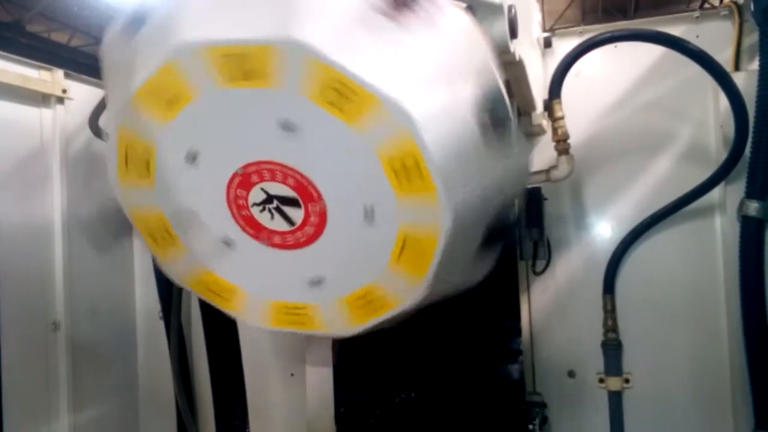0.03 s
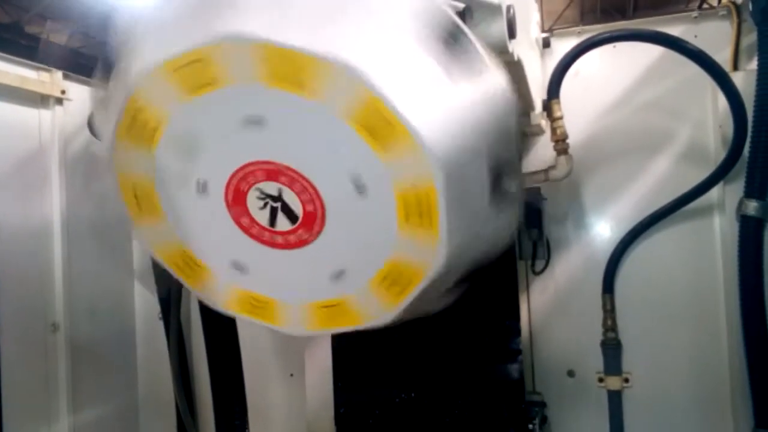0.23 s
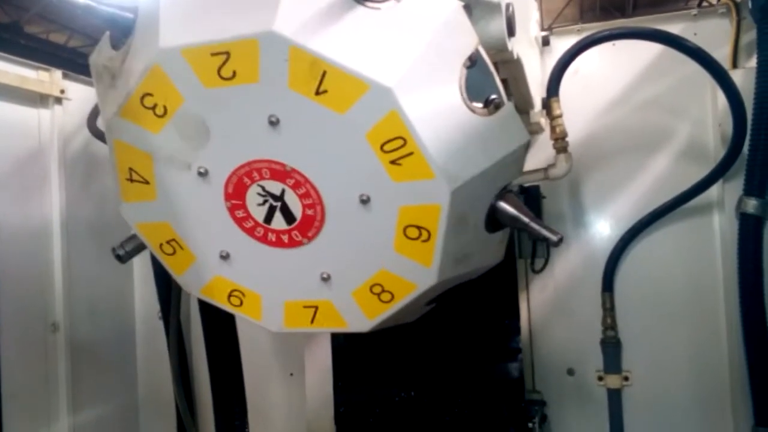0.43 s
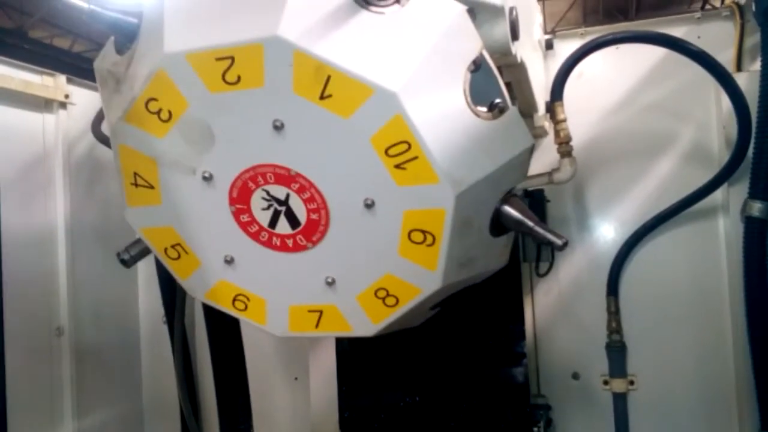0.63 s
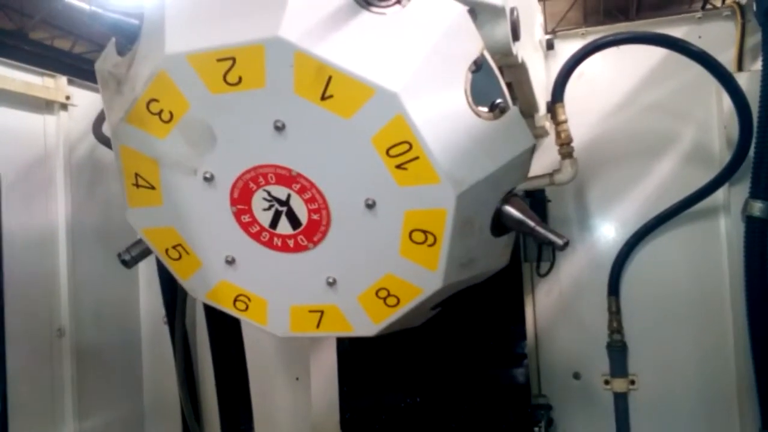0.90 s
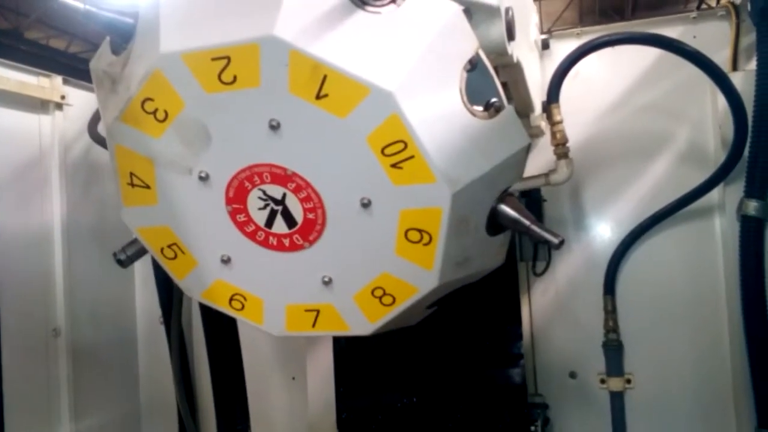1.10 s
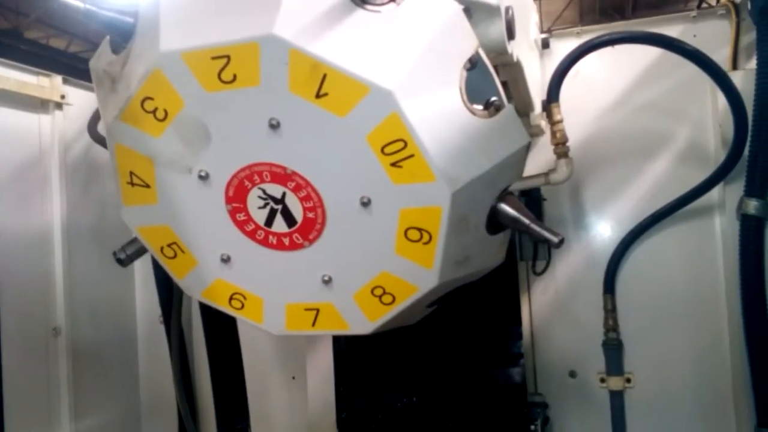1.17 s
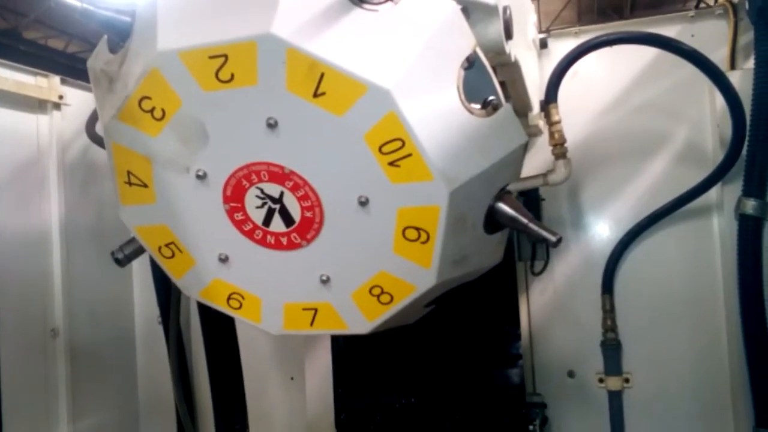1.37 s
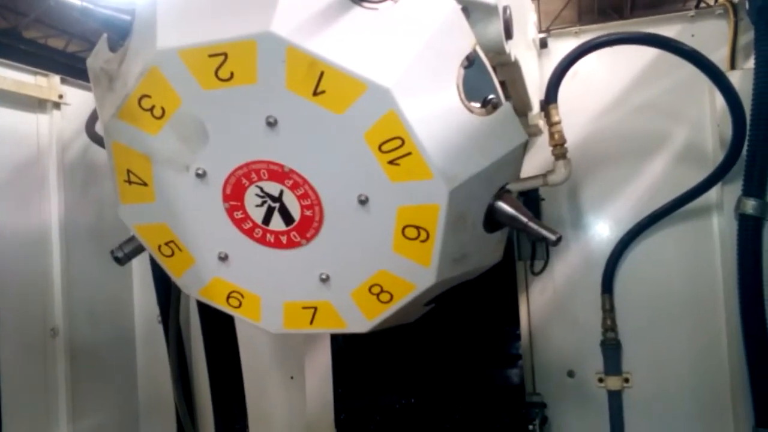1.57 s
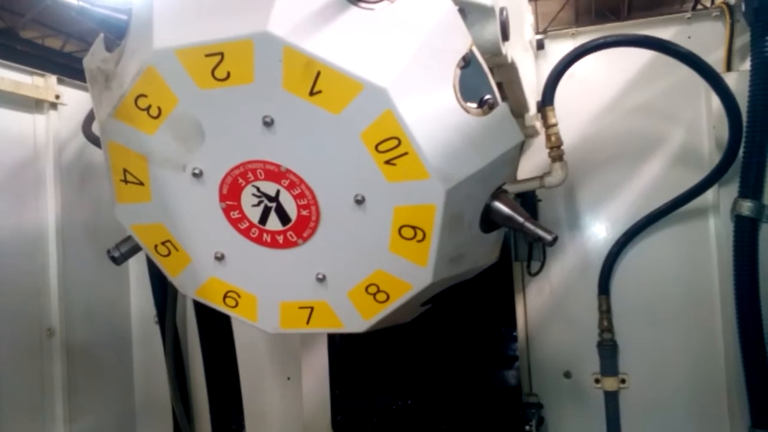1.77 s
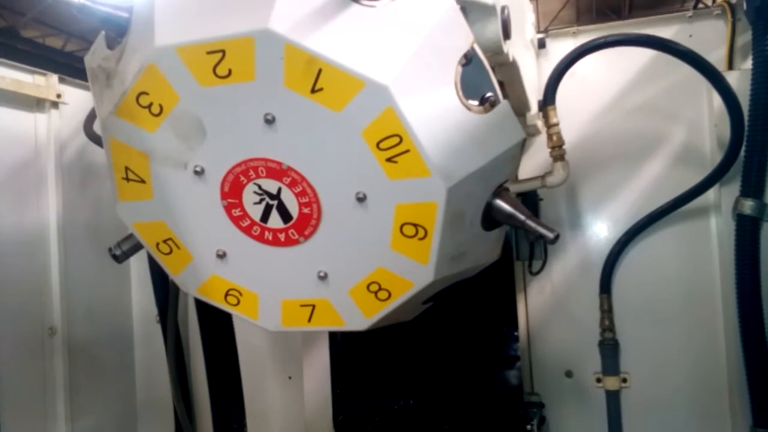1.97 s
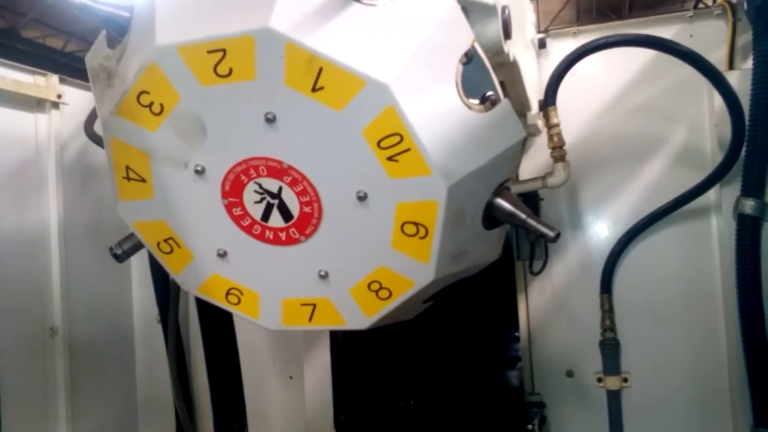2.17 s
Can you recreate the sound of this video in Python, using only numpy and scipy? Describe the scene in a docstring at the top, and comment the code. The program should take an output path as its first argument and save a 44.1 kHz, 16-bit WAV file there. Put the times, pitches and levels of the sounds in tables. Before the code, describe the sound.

Short, loud whirr and clunk of a turning tool turret, over machine hum and whistle.

```python
"""A rattling whirr of gears rises and falls: a tool turret swings two stations inside a steel machine tool.
The gears excite the resonances of the casing; steel clinks at top speed, the frame thuds at start and stop.
The servo drive's switching tone whistles throughout, over a humming pump, idle motors and cooling fans."""
import sys
import numpy as np
from scipy import signal
from scipy.fft import rfft, irfft
from scipy.io import wavfile
from scipy.ndimage import uniform_filter1d

SR = 44100
rng = np.random.default_rng(int(sys.argv[2]) if len(sys.argv) > 2 else 0)


def store_pcm(level_fs):
    """Save levels as 16-bit WAV."""
    pcm = np.round(np.clip(level_fs, -1, 1) * 32767).astype(np.int16)
    wavfile.write(sys.argv[1], SR, np.atleast_2d(pcm).T)


N = 99225
T = np.arange(N) / SR
HZ = np.fft.rfftfreq(N, 1 / SR)
START_S, TOP_S, STOP_S = .215, .408, .6
EDGE_HZ = 8500


def amp(db):
    """Decibels to gain."""
    return 10 ** (np.asarray(db) / 20)


def unit(x):
    """Scale to rms 1."""
    return x / np.sqrt(np.mean(x ** 2) + 1e-20)


def level(points):
    """Gain over time from (s, dB) points."""
    return amp(np.interp(T, *np.transpose(points)))


def over_hz(points, column=1):
    """Table column interpolated over log frequency."""
    rows = np.array(points, float)
    return np.interp(np.log(HZ + 1), np.log(rows[:, 0] + 1), rows[:, column])


def shape(x, gain):
    """Filter by a gain per frequency."""
    return irfft(rfft(x) * gain, N)


def noise():
    """Two channels of white noise."""
    return rng.standard_normal((2, N))


def drift(rate_hz):
    """Low-passed noise, rms 1."""
    return unit(shape(rng.standard_normal(N), np.exp(-(HZ / rate_hz) ** 2)))


def sides(left_db):
    """Stereo gains, left louder by left_db."""
    return amp([[left_db / 2], [-left_db / 2]])


def speed():
    """Turret motor speed: 0 to 1 and back."""
    return np.interp(T, [START_S, TOP_S, STOP_S], [0, 1, 0])


def gear_mesh(top_hz=1610, jitter=.0217, tilt_db_per_octave=1):
    """Meshing teeth whine in harmonics that follow the speed."""
    tooth_hz = top_hz * speed()
    phase = 2 * np.pi * np.cumsum(tooth_hz * (1 + jitter * drift(320))) / SR
    return sum(amp(tilt_db_per_octave * np.log2(k)) * np.sin(k * phase) * (k * tooth_hz < EDGE_HZ)
               for k in range(1, 13))


def gears(hits_per_s=9000, spread_db=1.5, mesh_db=-18):
    """Dense rattle and faint tooth whine excite the casing; three bands follow their own levels."""
    # Casing resonances. Each row: frequency in Hz, width in Hz, gain in dB.
    modes = [(250, 14, 7), (350, 22, 5), (465, 25, 3), (985, 40, 3), (1215, 25, 4), (1262, 10, 6),
             (1640, 30, 6), (1800, 30, 2), (2340, 35, 2), (2572, 25, 4), (2895, 55, 10), (3312, 35, 5),
             (3608, 28, 8), (3920, 40, 11), (4180, 90, 2), (4750, 90, 4), (5122, 20, 9), (6880, 80, 3)]
    # Broad gearbox colour. Each row: frequency in Hz, gain in dB.
    colour = [(150, -4.5), (450, -2.5), (780, -9), (1000, -6.5), (1800, 0.5), (2200, -4.5), (3000, -1),
              (4700, -5.5), (5100, -8.5), (5800, -8.5), (6900, -7.5), (7500, -22.5), (8500, -57.5)]
    # Each row: lower and upper band edge in Hz.
    bands = [(180, 750), (750, 2500), (2500, 9000)]
    # Each row: time in seconds, then low, middle and high band level in dB.
    band_levels = [(.215, -43.5, -57, -51.5), (.25, -28.5, -34, -34.5), (.28, -26.5, -32, -35.5),
                   (.29, -28, -29.5, -27), (.334, -17.5, -21, -18.5), (.378, -22, -20, -17.5),
                   (.388, -26.5, -15, -14.5), (0.392, -28.5, -24, -25.5), (0.409, -34.5, -28, -20.5),
                   (.42, -30, -22.5, -23), (0.441, -28, -18.5, -12.5), (0.457, -28, -17.5, -13),
                   (0.506, -24.5, -18.5, -21.5), (0.523, -21, -27.5, -28), (.56, -34, -33, -33.5),
                   (.62, -37, -41.5, -45)]
    whine = amp(mesh_db) * gear_mesh() * np.array([[1], [0]])
    strength = noise() * amp(spread_db * np.minimum(rng.exponential(1, (2, N)), 3))
    rattle = unit(strength * (rng.random((2, N)) < hits_per_s / SR))
    casing = 1 + sum(amp(db) / (1 + 2j * (HZ - hz) / width_hz) for hz, width_hz, db in modes)
    body = shape(ports(rattle + whine, left_db=2.5), casing * amp(over_hz(colour)))
    whirr = 0
    for column, (low_hz, high_hz) in enumerate(bands, 1):
        band = shape(body, (HZ >= low_hz) & (HZ < high_hz))
        rms = np.sqrt(abs(uniform_filter1d(band.mean(0) ** 2, size=700)) + 1e-12)
        whirr += band / rms * level(np.array(band_levels)[:, [0, column]])
    gate = np.interp(T, [START_S - .01, START_S, STOP_S + .0082, STOP_S + .19], [0, 1, 1, 0])
    return whirr * gate


def clinks(rise_s=.0023, grit_gain=.58, grit_half_width_hz=680):
    """The indexing mechanism strikes steel on steel: short, rough rings."""
    # Each row: start in seconds, level in dB, pitch in Hz, T60 in seconds.
    strikes = [(.216, -34, 4330, 0.052), (.3972, 0, 4450, 0.021), (.4025, -10.5, 4426, 0.044),
               (.4245, -16, 2922, 0.096), (.4462, -16, 4870, 0.034), (.4525, -22, 4000, 0.094),
               (0.493, -13, 3880, 0.079), (0.514, -21, 1272, 0.21), (0.578, -22, 4340, 0.023),
               (0.784, -45, 6800, .12), (2.226, -37, 3720, 0.4)]
    rings = 0
    for start_s, db, hz, t60_s in strikes:
        t = np.maximum(T - start_s, 0)
        grit = unit(shape(noise(), 1 / (1 + ((HZ - hz) / grit_half_width_hz) ** 4)))
        envelope = np.minimum(t / rise_s, 1) * amp(db - 60 * t / t60_s)
        rings += envelope * (np.sin(2 * np.pi * hz * t) + grit_gain * grit)
    return rings * sides(2.1)


def frame_thuds(rise_s=.0079, ring_db=-8):
    """Low pushes set the frame ringing."""
    # Each row: start in seconds, level in dB, pitch of the push in Hz.
    thuds = [(0.23, -18.5, 122), (0.245, -18.5, 159.3), (0.268, -14, 62), (0.317, -18, 102),
             (0.478, -24.5, 99.3), (0.53, -14, 78.2), (0.591, -21, 76), (0.631, -27, 109),
             (0.699, -32, 78.5), (.752, -29, 108)]
    # Frame modes. Each row: frequency in Hz, relative level in dB, T60 in seconds.
    modes = [(68.4, 11, 1.0), (102.6, -7.5, .9), (119.5, -4.5, .6), (160.3, -16, 0.33), (249, -2, .9),
             (360, -2, .8)]
    push = 0
    for start_s, db, hz in thuds:
        t = np.maximum(T - start_s, 0)
        envelope = amp(db) * t / rise_s * np.exp(1 - t / rise_s)
        push -= envelope * np.sin(2 * np.pi * hz * t)
    response = sum(amp(db - 60 * T / t60_s) * np.sin(2 * np.pi * hz * T) for hz, db, t60_s in modes)
    ring = unit(signal.fftconvolve(push, response)[:N]) * np.std(push)
    return (push + amp(ring_db) * ring) * sides(.6)


def frame_rumble():
    """The frame's panels rumble through the swing and on after it."""
    # Each row: frequency in Hz, relative gain in dB.
    colour = [(30, -28), (55, -0.5), (100, 2), (170, 0), (205, -14), (250, -1.5), (300, -12), (360, -1.5),
              (450, -24.5), (550, -27), (800, -25.5), (2000, -47.5)]
    # Each row: time in seconds, level in dB.
    swell = [(.21, -56), (.24, -31.5), (.34, -24), (.41, -36.5), (.5, -24), (.56, -21.5), (.64, -28.5),
             (.72, -34.5), (.81, -29.5), (.9, -40), (1.1, -42)]
    return unit(shape(ports(noise()), amp(over_hz(colour)) * (HZ < 2000))) * level(swell)


def whines():
    """Brief tones that swell, glide and fade."""
    # Each row: centre and half length in seconds, level in dB, pitch in Hz, glide in Hz per second.
    swells = [(.16, 0.046, -44, 545, 4), (0.388, 0.055, -29.5, 1025, -1100), (0.813, 0.022, -31, 551, -4)]
    tones = 0
    for centre_s, half_s, db, hz, glide_hz_per_s in swells:
        t = T - centre_s
        envelope = amp(db) * np.exp(-(t / half_s) ** 2)
        tones += envelope * np.sin(2 * np.pi * (hz + glide_hz_per_s * t / 2) * t)
    return tones * sides(2)


def servo(switch_hz=6000, top_offset_hz=26.5, flutter=.05, right_lag_rad=2.67):
    """The drive's switching tone splits into a beating pair while the motor turns."""
    # Whistle level under load. Each row: time in seconds, left and right level in dB.
    load = [(0, -31, -44), (0.214, -32, -41), (.235, -19, -29.5), (.33, -19, -36), (.42, -27.5, -49),
            (.53, -26.5, -48), (.575, -29.5, -43), (.62, -25.5, -29.5), (0.759, -41, -36),
            (.85, -33.5, -43.5), (1.07, -30.5, -37.5), (1.4, -33, -37), (2.25, -35.5, -39.5)]
    beat_phase = 2 * np.pi * np.cumsum(top_offset_hz * speed()) / SR
    split = np.where(T < TOP_S, 1, np.clip(speed() * 10, 0, 1))  # one tone again at rest
    beat = 1 - split + split * np.cos(beat_phase)
    envelope = np.sqrt(2) * beat * (1 + flutter * drift(30))
    phase = 2 * np.pi * switch_hz * T
    left = level(np.array(load)[:, [0, 1]]) * np.sin(phase)
    right = level(np.array(load)[:, [0, 2]]) * np.sin(phase - right_lag_rad)
    return envelope * np.array([left, right])


def pump(pitch_hz=273.3, waver=.00055, flutter=.053, right_lag_s=.00004):
    """The pump hums in slightly wavering harmonics, a little to the left."""
    # Each row: harmonic number, level in dB.
    harmonics = [(1, -46.5), (2, -53), (3, -59.5), (4, -40), (5, -58.5), (6, -49), (7, -61), (8, -60),
                 (9, -59), (10, -51), (11, -59.5), (13, -60.5), (23, -70)]
    cycles = np.cumsum(pitch_hz * (1 + waver * drift(9.7))) / SR
    phase = 2 * np.pi * (cycles - pitch_hz * np.array([[0], [right_lag_s]]))
    hum = sum(amp(db) * (1 + flutter * drift(6.1)) * np.sin(k * phase + 2 * np.pi * rng.random())
              for k, db in harmonics)
    return np.sqrt(2) * hum * sides(2.5)


def idle_motors():
    """Idling motors give a deep hum and a thin wandering tone."""
    # Each row: pitch in Hz, rms waver in Hz, level in dB.
    tones = [(53.4, .6, -49.5), (655, 16.64, -52)]
    return sum(np.sqrt(2) * amp(db) * np.sin(2 * np.pi * np.cumsum(hz + waver_hz * drift(7)) / SR)
               for hz, waver_hz, db in tones)


def fans(air_db=-34.5):
    """Cooling air rushes in the enclosure; narrow drones flutter, one at the pump's second harmonic."""
    # Air spectrum. Each row: frequency in Hz, relative gain in dB.
    colour = [(25, -22), (50, -1.5), (100, -4.5), (160, -1), (215, -1.5), (350, -8.5), (500, -9), (680, -7),
              (800, -15), (950, -14), (1100, -13.5), (1400, -16.5), (1600, -12.5), (2000, -14.5),
              (3000, -13), (4300, -16.5), (5500, -14.5), (6500, -15.5), (7100, -19.5), (8000, -23),
              (8600, -46.5)]
    # Each row: drone centre in Hz, width in Hz, level in dB.
    drone_bands = [(170, 12, -47), (252.3, 16, -42), (546.7, 28, -44.5), (644, 26, -51)]
    air = shape(ports(enclosure(noise()), left_db=1.5), amp(over_hz(colour)))
    drones = sum(amp(db) * unit(shape(ports(noise()), 1 / (1 + (2 * (HZ - hz) / width_hz) ** 2)))
                 for hz, width_hz, db in drone_bands)
    return amp(air_db) * unit(air) + drones


def enclosure(x, t60_s=.19, tail_db=-5.5):
    """The steel walls add a short, dense tail."""
    tail = noise() * amp(-60 * T / t60_s) * (T > .004)
    tail /= np.linalg.norm(tail, axis=1, keepdims=True)
    return x + amp(tail_db) * signal.fftconvolve(x, tail, axes=1)[:, :N]


def ports(pair, left_db=0):
    """Two unrelated signals as two microphone ports hear them: alike in the bass, apart in the treble."""
    # Each row: frequency in Hz, unrelated part in dB, right lag in radians (scaled down below 300 Hz).
    spacing = [(100, -21, 0), (300, -14, .12), (600, -10.5, .25), (1500, -7, .05), (3000, -3, .15),
               (4000, -1.2, .3), (4900, -1, 1.2), (5900, -2.5, 2.9), (7500, -4.5, 3.1)]
    left, unrelated = rfft(pair)
    apart = np.minimum(amp(over_hz(spacing)), 1)
    lag_rad = over_hz(spacing, column=2) * np.minimum(HZ / 300, 1)
    right = (np.sqrt(1 - apart ** 2) * left + apart * unrelated) * np.exp(-1j * lag_rad)
    balance = sides(left_db) ** (HZ / (HZ + 500))  # bass stays centred
    return irfft(np.array([left, right]) * balance, N)


def scene():
    """Turret swing over the idling machine."""
    turret = gears() + enclosure(clinks()) + frame_thuds() + frame_rumble() + whines()
    return turret + servo() + pump() + idle_motors() + fans()


def record(dry):
    """Deep bass and top treble are cut; a soft limiter rounds the highest peaks."""
    low_cut_hz, ceiling = 47, .92
    thin = shape(dry, 1 / np.sqrt(1 + (low_cut_hz / (HZ + 1)) ** 12))
    rounded = thin / (1 + (thin / ceiling) ** 8) ** (1 / 8)
    low_pass = signal.firwin(511, EDGE_HZ, window=("kaiser", 9), fs=SR)
    return signal.oaconvolve(rounded, low_pass[None], "same")


dry = scene()
out = record(dry)
store_pcm(out)
```